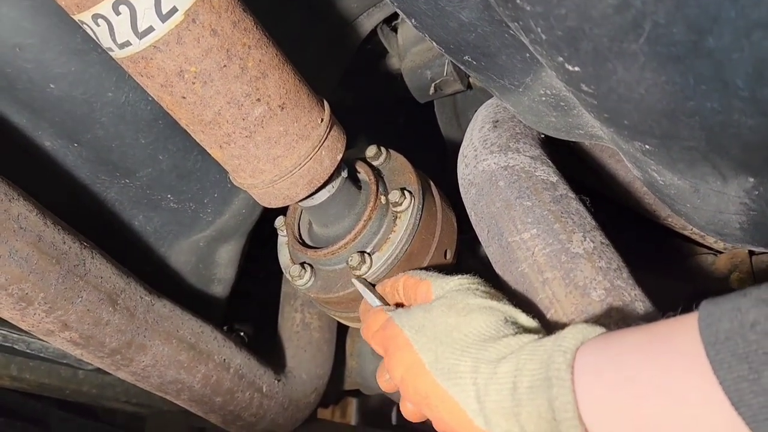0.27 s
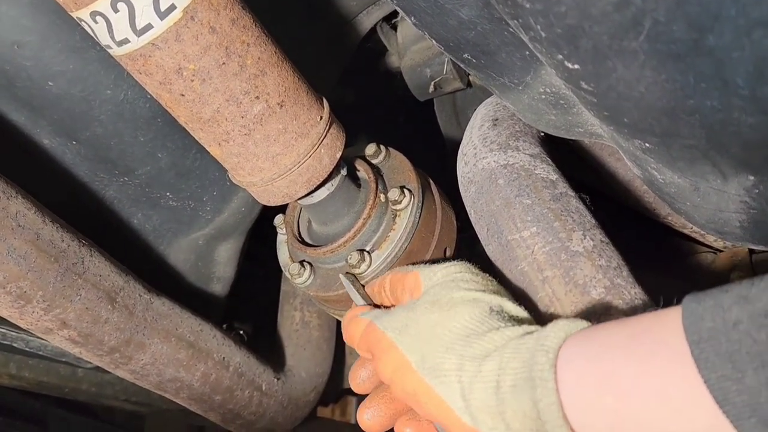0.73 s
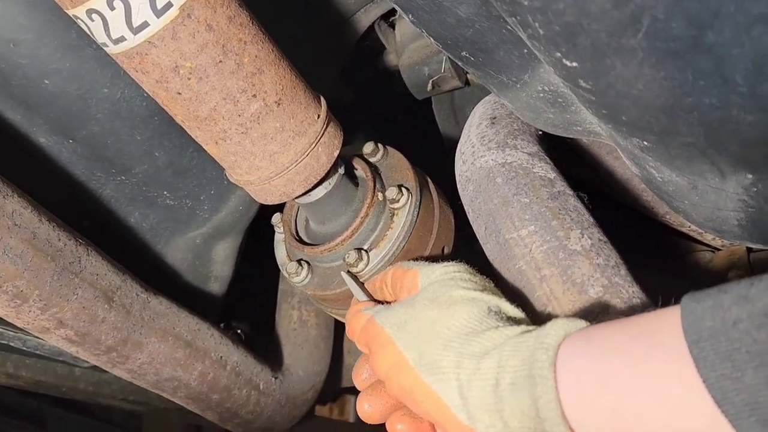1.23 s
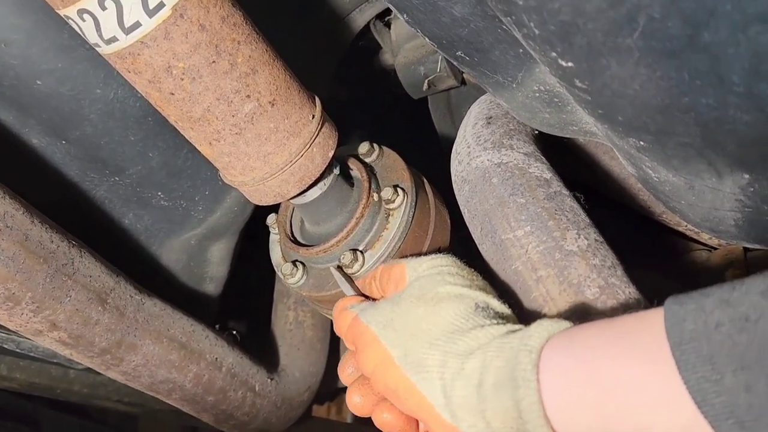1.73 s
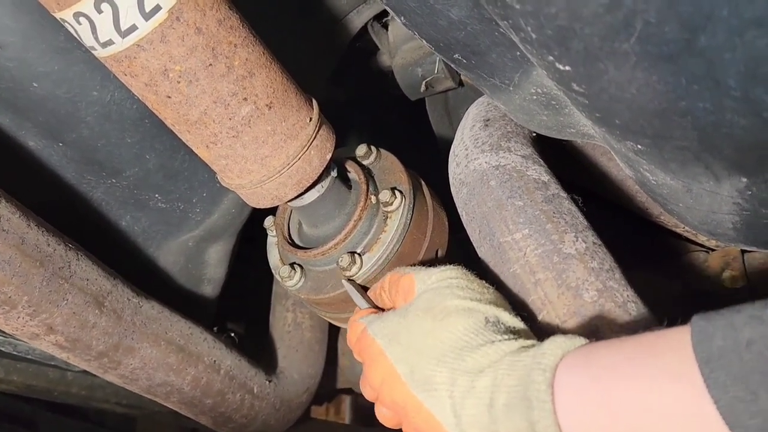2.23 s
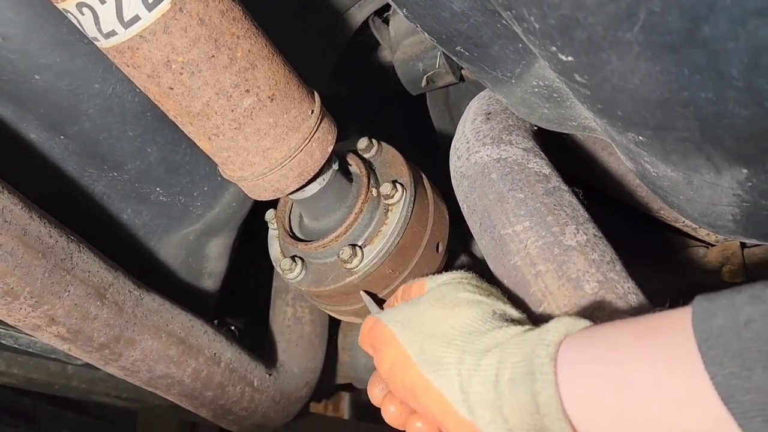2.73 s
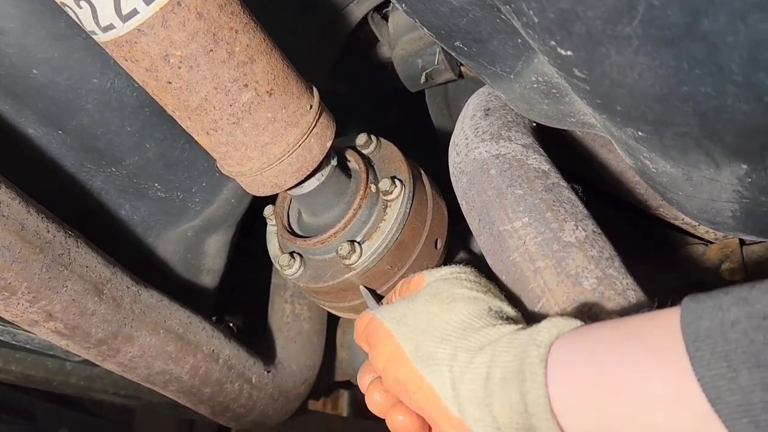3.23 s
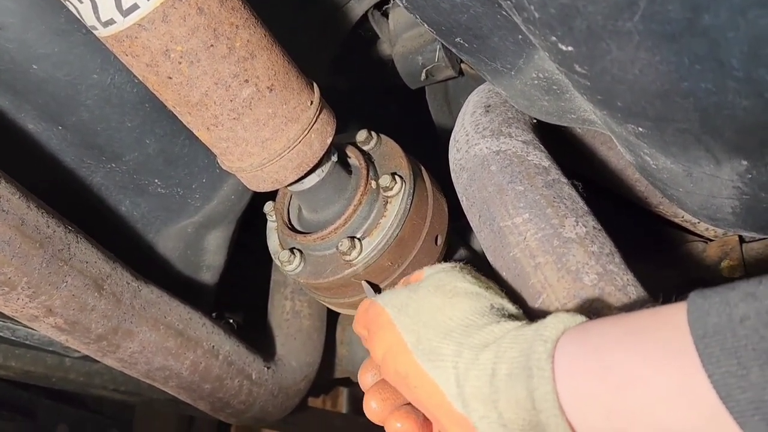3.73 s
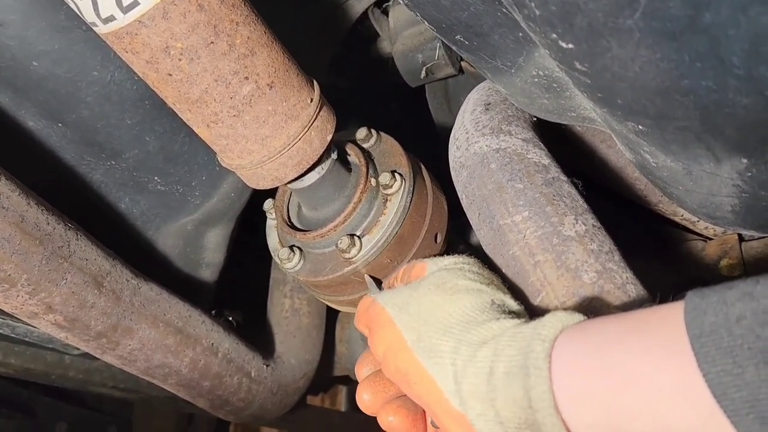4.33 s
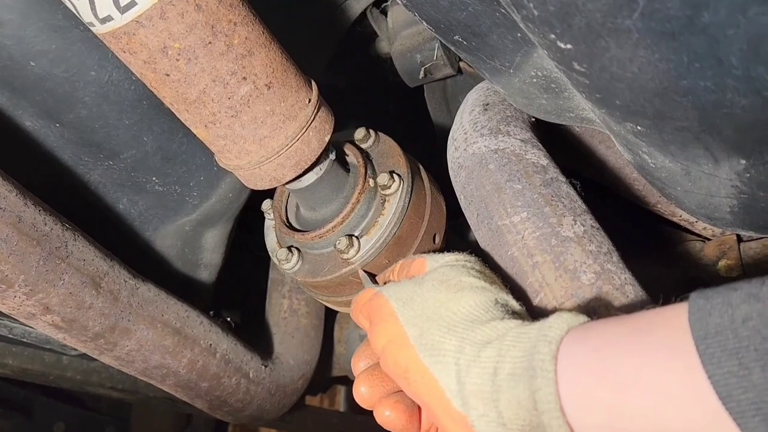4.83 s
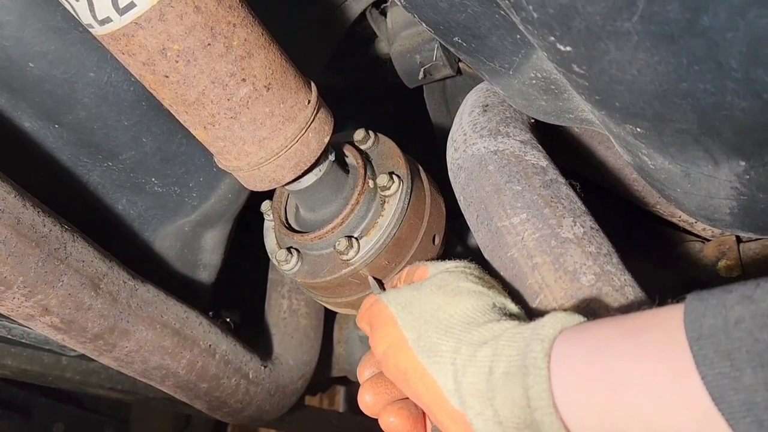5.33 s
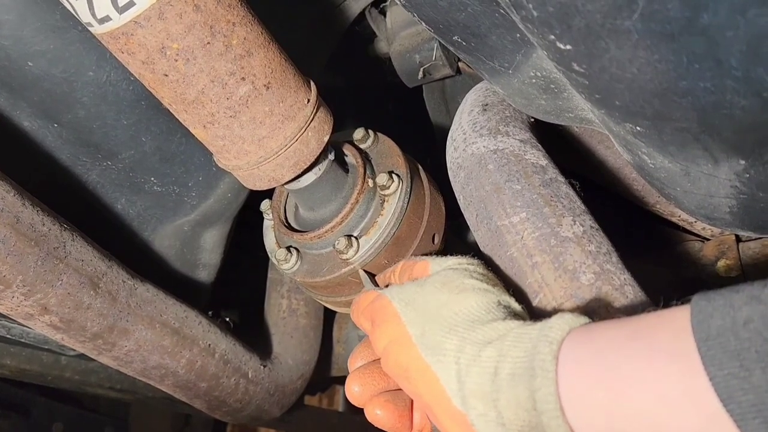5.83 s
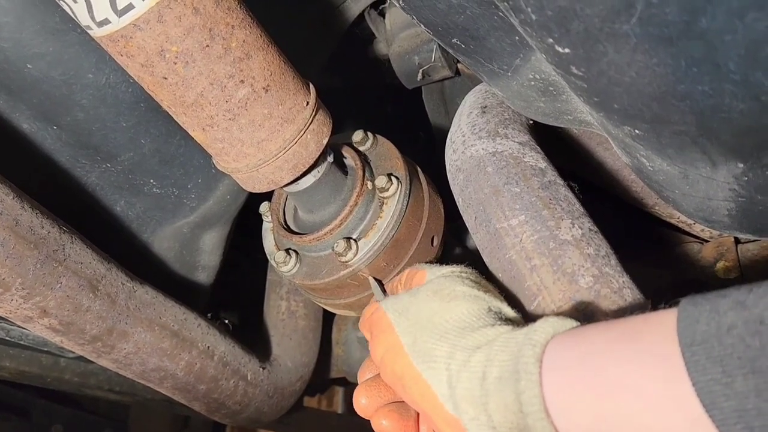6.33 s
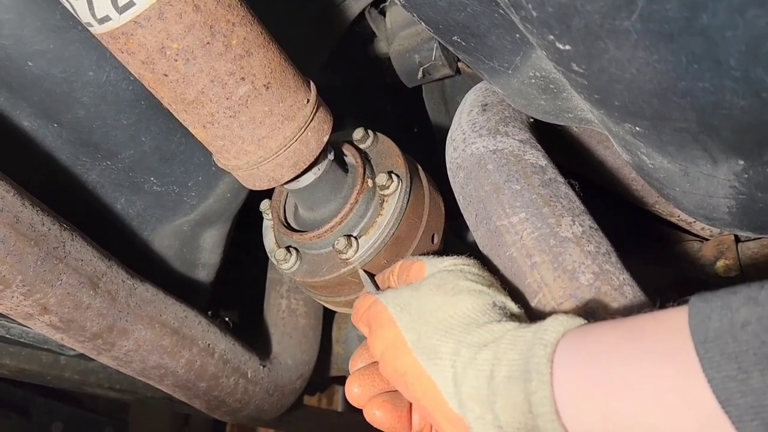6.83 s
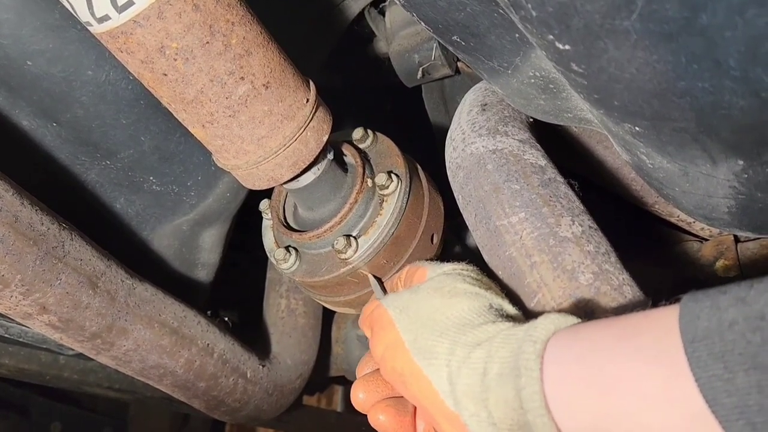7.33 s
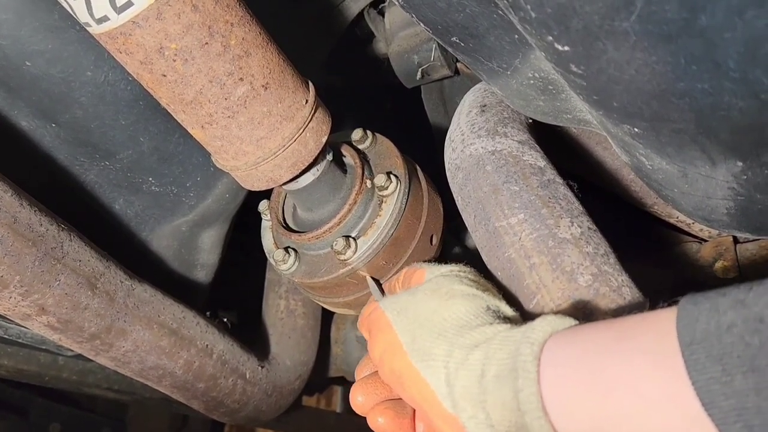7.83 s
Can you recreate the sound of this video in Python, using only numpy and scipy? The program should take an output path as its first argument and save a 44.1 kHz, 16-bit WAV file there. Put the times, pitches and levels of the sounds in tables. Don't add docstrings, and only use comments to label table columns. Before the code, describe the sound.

Close, dry metal scratching in the cramped underside of a vehicle. Short rasping strokes with crackling rust grains come irregularly, many ending in a bright tick as the tip jumps, with a dull knock and short ring from the joint and hollow shaft. Light rustling grazes fill some gaps. Behind it all sits a quiet garage bed of deep hum, motor tone and soft air hiss, heard in stereo.

```python
import sys
import numpy as np
from scipy import signal
from scipy.fft import rfft, irfft
from scipy.io import wavfile
from scipy.ndimage import uniform_filter1d

SR = 44100
rng = np.random.default_rng(int(sys.argv[2]) if len(sys.argv) > 2 else 0)


def to_wav(sig):
    pcm = np.clip(np.atleast_2d(sig), -1, 1) * 32767
    pcm = np.round(pcm).astype(np.int16)
    wavfile.write(sys.argv[1], SR, pcm.T)


def volts_from_db(level):
    exponent = np.asarray(level, float) / 20
    return 10 ** exponent


N = 356328
TIME = np.arange(N) / SR
EARS = np.array([0.5, -0.5])


def level(x, db):
    return x * volts_from_db(db) / np.sqrt(np.mean(x ** 2))


def unit_energy(x):
    return x / np.sqrt(np.sum(x ** 2))


def decay(t, t60):
    return 1000. ** (-t / t60)


def walk(rate):
    k = int(SR / rate)
    steps = np.repeat(rng.standard_normal(N // k + 1), k)
    return 1.02 * uniform_filter1d(uniform_filter1d(steps, k), k)[:N]


def along(table, hz):
    points, values = np.array(table).T[:2]
    return np.interp(np.log(hz), np.log(points), values)


def coloured(table):
    size = 2048
    hz = np.maximum(np.arange(size // 2 + 1) * SR / size, 1)
    cepstrum = irfft(np.log(volts_from_db(np.maximum(along(table, hz), -45))))
    cepstrum[1:size // 2] *= 2
    cepstrum[size // 2 + 1:] = 0
    return unit_energy(irfft(np.exp(rfft(cepstrum)))[:size // 2])


def ring(x, hz, t60):
    r = decay(1 / SR, t60)
    turn = 2 * np.pi * hz / SR
    return signal.lfilter([np.sin(turn)], [1, -2 * r * np.cos(turn), r * r], x)


def struck(modes, sides=0):
    click = np.zeros(16384)
    click[0] = 1
    out = np.zeros(len(click))
    for k, (hz, db, t60) in enumerate(modes):
        out += (-1) ** k * volts_from_db(db + sides * rng.standard_normal()) * ring(click, hz, t60)
    return unit_energy(out)


def diffuse(gain):
    # f/Hz, likeness [0-1]
    likeness = [(30, 1), (130, 0.98), (290, 0.87), (640, 0), (1400, 0.04), (15000, 0.24)]
    hz = np.maximum(np.arange(N // 2 + 1) * SR / N, 1)
    alike = np.clip(along(likeness, hz), 0, 1)
    mid = irfft(rfft(rng.standard_normal(N)) * gain(hz) * np.sqrt(1 + alike), N)
    side = irfft(rfft(rng.standard_normal(N)) * gain(hz) * np.sqrt(1 - alike), N)
    return np.array([mid + side, mid - side])


def steady_air():
    # f/Hz, level/dB per Hz
    hiss_colour = [(76, -39.5), (130, -3), (258, -20.5), (328, -6), (453, -12.5), (692, -22.5), (1010, -24),
                   (1820, -29.5), (2830, -27.5), (4150, -39), (6870, -55.5), (7910, -45), (10300, -75),
                   (13100, -55), (16000, -53)]
    return level(diffuse(lambda hz: volts_from_db(along(hiss_colour, hz))), -57.5) * volts_from_db(0.8 * walk(3))


def duct_tones():
    # f/Hz, width/Hz, level/dB
    duct_modes = [
        (118.65, 9.6, -55),
        (74.3, 6.2, -54),
        (1005, 7.9, -79),
    ]
    out = np.zeros((2, N))
    for mode_hz, width, db in duct_modes:
        out += level(diffuse(lambda hz: 1 / (1 + (2 * (hz - mode_hz) / width) ** 2)), db)
    return out


def fan_motor():
    # f/Hz, level/dB, wander/Hz
    motor = (322.6, -60.5, 0.51)
    motor_hz, motor_db, wander_hz = motor
    phase = 2 * np.pi * np.cumsum(motor_hz + wander_hz * walk(3.85)) / SR
    return level(np.sin(phase) * volts_from_db(0.38 * walk(4.4)), motor_db)


def low_rumble():
    # f/Hz, level/dB per Hz
    rumble_colour = [(12, -48), (20, -22.5), (59, 2), (75, 5), (123, -8), (146, -14.5), (220, -16),
                     (290, -34.5), (480, -120)]
    # t/s, level/dB
    thumps = [(1.95, -49), (2.48, -35.5), (2.88, -49), (3.419, -38.5), (3.76, -50), (4.66, -47.5),
              (5.06, -45.5), (6.33, -50), (6.82, -44.5), (7.16, -42.5), (7.54, -46.5), (7.83, -40.5)]
    rise_s, t60_s = 0.032, 0.48
    swell = np.full(N, volts_from_db(-49.5))
    for s, db in thumps:
        since = TIME - s
        swell += volts_from_db(db + np.where(since < 0, 20 * since / rise_s, -60 * since / t60_s))
    return level(diffuse(lambda hz: volts_from_db(along(rumble_colour, hz))), 0) * swell


def garage():
    return low_rumble() + duct_tones() + fan_motor() + steady_air()


def stroke(start, hardest, end, db, rise_db, fall_db, bend):
    span = slice(max(int(start * SR), 0), int(end * SR))
    t = TIME[span]
    before = np.clip((hardest - t) / max(hardest - start, 0.002), 0, 1)
    after = np.clip((t - hardest) / max(end - hardest, 0.002), 0, 1)
    edge = np.clip(np.minimum(t - start, end - t) / 0.007, 0, 1)
    return span, edge * volts_from_db(db - rise_db * before ** bend - fall_db * after ** bend)


def grains(per_s, spread_db):
    chance = rng.random((3, N))
    size = volts_from_db(-spread_db * np.log(chance[1] + 0.049))
    snaps = (chance[0] < per_s / SR) * size * np.sign(chance[2] - 0.5)
    return level(snaps * volts_from_db(2.0 * walk(90)), 0)



def glove_push():
    # t/s, level/dB
    rustle = [(0.0, -74.5), (0.7, -78.5), (1.2, -81.5), (1.9, -76), (3.0, -81.5), (4.2, -82.5),
              (5.6, -86.5), (6.3, -82), (7.0, -86.5), (8.08, -82)]
    # middle t/s, length/s, level/dB
    grazes = [(0.963, 0.13, -80), (1.33, 0.13, -74.5), (2.295, .05, -73), (3.079, .08, -73),
              (3.615, 0.086, -78), (4.003, 0.096, -80), (4.42, 0.11, -79), (4.549, 0.11, -73.5),
              (4.692, 0.045, -74.5), (5.174, 0.051, -76), (5.518, 0.054, -81), (5.646, 0.043, -80),
              (6.238, 0.036, -75), (6.378, .03, -74), (1.545, 0.087, -82), (0.105, 0.1, -79)]
    light = volts_from_db(np.interp(TIME, *np.transpose(rustle)))
    for s, length, db in grazes:
        span, push = stroke(s - length / 2, s, s + length / 2, db, 14, 14, 2)
        light[span] += push
    out = np.zeros((6, 2, N))
    layers = volts_from_db(np.array([0, -5.5]))
    out[[0, 3]] = layers[:, None, None] * volts_from_db(12 * EARS)[:, None] * light
    return out


def stroke_push():
    # start t/s, hardest t/s, end t/s, grit level/dB, ring of tip and joint/dB above usual
    scrapes = [(0.424, 0.498, 0.69, -52.5, -2.5), (1.664, 1.692, 1.752, -51, -0.5),
               (1.77, 1.828, 1.93, -50, -1), (2.111, 2.131, 2.2, -58.5, 1), (2.33, 2.37, 2.43, -64, 2),
               (2.415, 2.465, 2.535, -43, -4), (2.634, 2.674, 2.8, -60, 3), (2.7, 2.83, 2.96, -54, -1),
               (4.916, 4.932, 4.95, -61, 14), (4.988, 5.005, 5.03, -53, 16), (5.76, 5.788, 5.82, -57, 4),
               (5.79, 5.822, 5.842, -57, 8), (6.12, 6.146, 6.172, -48, 10), (6.709, 6.765, 6.795, -54, 8.5),
               (6.67, 6.698, 6.73, -66.5, 11.5), (7.418, 7.432, 7.45, -63, -8)]
    # start t/s, jump t/s, last grit level/dB, ring/dB above usual
    run_ups = [(0.6, 0.628, -52, 4), (3.328, 3.377, -48.5, 7), (5.093, 5.12, -52, 8),
               (6.205, 6.31, -63.5, 10), (7.062, 7.117, -43, 8), (7.46, 7.537, -51, 11),
               (7.77, 7.814, -40, 9), (8.05, 8.087, -52.5, 9.5)]
    strokes = []
    for start, hardest, end, db, ring_db in scrapes:
        strokes.append((stroke(start, hardest, end, db, 18.5, 22.5, 1.97), ring_db))
    for start, jump, db, ring_db in run_ups:
        strokes.append((stroke(start, jump, jump + 0.006, db, 30, 0, 1.6), ring_db))
    out = np.zeros((6, 2, N))
    for (span, push), ring_db in strokes:
        layers = volts_from_db(np.array([0, -11 + ring_db, -6.5 + 0.79 * ring_db, -6.5 - 0.15 * ring_db]))
        out[:4, :, span] += layers[:, None, None] * volts_from_db(4.5 * EARS)[:, None] * push
    return out


def tick_blows():
    ticks = [(0.555, -48.5, -14, -4.5, -15), (0.632, -31, -2.5, -5, -22), (1.678, -50, -21, -14, -24),
             (2.1273, -59, -13, -16, -16), (2.1916, -60, -16, -11, -19), (2.2977, -56.5, -15, -10, -16),
             (2.415, -57, -17, -22, -12), (2.4285, -38.5, -8.5, -6, -17), (2.676, -42.5, -22, -19, -23),
             (2.736, -53, -21, -7, -29), (2.7526, -40.5, -25, -9, -29), (3.1721, -55, -16, 1, -17),
             (3.381, -25.5, -10, -4.5, -11.5), (3.957, -60, 11, 15, -19), (4.9333, -64, -3, -9, -20),
             (5.0065, -54, 22, 9, -12), (5.1251, -45, -5, 5.5, -1.5), (6.135, -41, 5.5, -20, -22),
             (6.3123, -40.5, -30, 2, -8), (7.1209, -19.5, -9, -10.5, -19), (7.43, -61, -21, -13, -21),
             (7.5407, -39, -2, 0.5, -8), (7.8172, -19.5, -5, -8.5, -23)]
    blows = np.zeros((7, 2, N + 200))
    chatter = rng.random((len(ticks), 2, 5))
    for (s, db, tip_db, knock_db, ring_db), (gaps, sizes) in zip(ticks, chatter):
        at = int(s * SR)
        pan_db = 3 + 0.0069 * (db + 37)
        layers_db = np.array([0, tip_db, 0, -13, 0, knock_db, ring_db])
        push = volts_from_db(db + layers_db[:, None] + pan_db * EARS)
        blows[:, :, at] += push
        for late, size in zip(np.cumsum(0.00015 + 0.0004 * gaps), 2 * sizes - 1):
            strength = np.sign(size) * (0.67 + 0.5 * abs(size)) * np.exp(-late / 0.0023)
            blows[3:5, :, at + int(late * SR)] += push[3:5] * strength
    return blows[:, :, :N]


def layer_sounds():
    # f/Hz, level/dB per Hz
    grit = [(2060, -27.5), (3500, -6), (3970, -2.5), (4340, 0), (5140, -4), (5570, -0.5), (6080, -2),
            (7700, 2), (8910, -7), (9800, -14), (12700, -37), (21600, -120)]
    # f/Hz, width/Hz, level/dB
    tip = [(3077, 85, 1), (3320, 306, -7), (2984, 160, -8), (1297, 87, -10.5), (7770, 180, -17),
           (14500, 300, -19)]
    # f/Hz, level/dB per Hz
    rasp = [(290, -40.5), (500, -1), (633, -8.5), (837, -4.5), (901, -3), (1840, -4), (2900, -9.5),
            (3770, -26), (6380, -120)]
    # f/Hz, level/dB per Hz
    sharp = [(5760, -13), (9800, -20), (10800, -1), (12900, 4.5), (15700, -1)]
    # f/Hz, level/dB per Hz
    crack = [(2060, -40.5), (3500, -7), (4020, -12), (4450, -3), (5030, -2), (5790, 1), (6150, -1.5),
             (6820, -8), (7600, -7.5), (9390, -17), (9800, -17.5), (12700, -49), (21600, -120)]
    # f/Hz, level/dB per Hz
    knock = [(180, -24.5), (300, -12), (535, -7), (1080, -2.5), (1260, -0.5), (1600, 0), (1900, -8.5),
             (2150, 1), (2530, -11.5), (2700, -9), (3510, -46), (5940, -120)]
    tip_modes = [(hz, db + 20 * np.log10(width / 100), np.log(1000) / (np.pi * width)) for hz, width, db in tip]
    return [coloured(grit), struck(tip_modes), coloured(rasp), coloured(sharp), coloured(crack), coloured(knock)]


def underbody(t60, tail_db, lag_s):
    age = np.arange(12000) / SR
    noise = rng.standard_normal(len(age))
    dull = signal.lfilter([0.4], [1, -0.6], noise)
    tail = dull + (noise - dull) * (0.3 + 0.7 * np.exp(-age / 0.0086))
    fade = decay(age, t60) + volts_from_db(-23) * decay(age, 0.45)
    tail *= fade * (1 - np.exp(-age / 0.0003))
    path = volts_from_db(tail_db) * unit_energy(tail)
    path[int(lag_s * SR)] += 1
    return path / np.sqrt(1 + volts_from_db(2 * tail_db))


def shaft_ring():
    # f/Hz, level/dB, t60/s
    shaft_modes = [(700, -17, 0.23), (1015, -28, .2), (1165, -5, 0.15), (1449, 7, 0.077), (1510, -8, 0.13),
                   (1625, -5, 0.1), (1648, -4.5, 0.39), (1702, -3, 0.31), (1730, -0.5, 0.16),
                   (1884, 5.5, 0.062), (2063, 2.5, 0.15), (2180, -8, 0.059), (2330, -8, .15),
                   (4160, -14.5, 0.056)]
    out = struck(shaft_modes, sides=1.5)
    return volts_from_db(28.5) * out * (1 - np.exp(-np.arange(len(out)) / SR / 0.0024))


def scratching():
    # tail t60/s, tail level/dB, left minus right/dB, tick boost/dB, right lag/s
    paths = [
        (0.087, -1, 0, -34, .0001),
        (0.08, -5, 7.5, 18.5, .0001),
        (0.14, 2, 0, -21, .00005),
        (0.09, 4, -7.5, 6.5, .0001),
        (0.1, -4, 2.5, 15, .0001),
        (0.25, -1, -2, 21, .0001),
    ]
    scrape = (stroke_push() + glove_push()) * grains(per_s=3000, spread_db=3.5)
    blows = tick_blows()
    sounds = layer_sounds()
    out = np.zeros((2, N))
    for ear in range(2):
        for k, (t60, tail_db, side_db, boost_db, lag_s) in enumerate(paths):
            path = underbody(t60, tail_db, ear * lag_s)
            heard = signal.fftconvolve(sounds[k], path) * volts_from_db(side_db * EARS[ear])
            push = scrape[k, ear] + volts_from_db(boost_db) * blows[k, ear]
            out[ear] += signal.oaconvolve(push, heard)[:N]
        out[ear] += signal.fftconvolve(blows[6, ear], shaft_ring())[:N]
    return out


def scene():
    return garage() + scratching()


def low_pass(x):
    return signal.sosfilt(signal.butter(12, 16590, fs=SR, output="sos"), x)


def record(dry):
    top_cut = signal.ellip(10, 0.2, 60, 15880, fs=SR, output="sos")
    mix = signal.sosfilt(top_cut, dry)
    return low_pass(mix)


dry = scene()
out = record(dry)
to_wav(out)
```